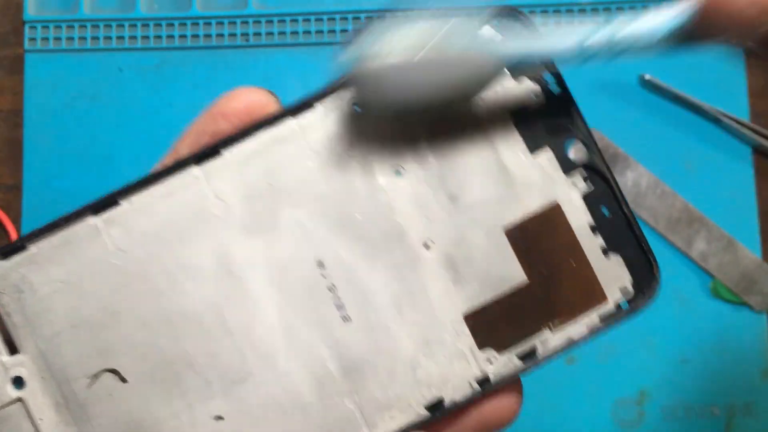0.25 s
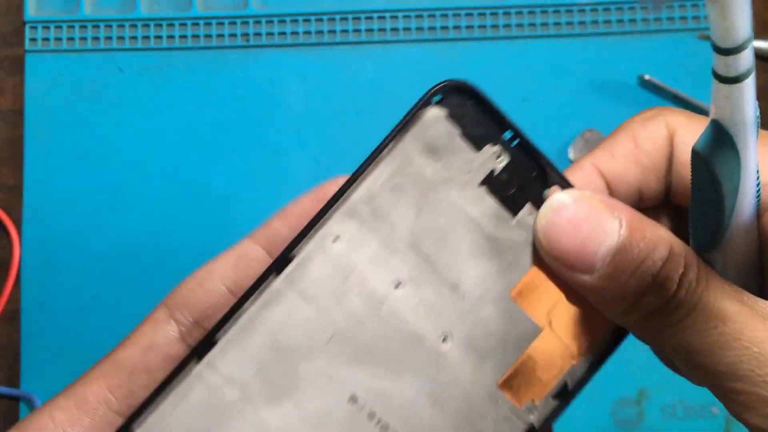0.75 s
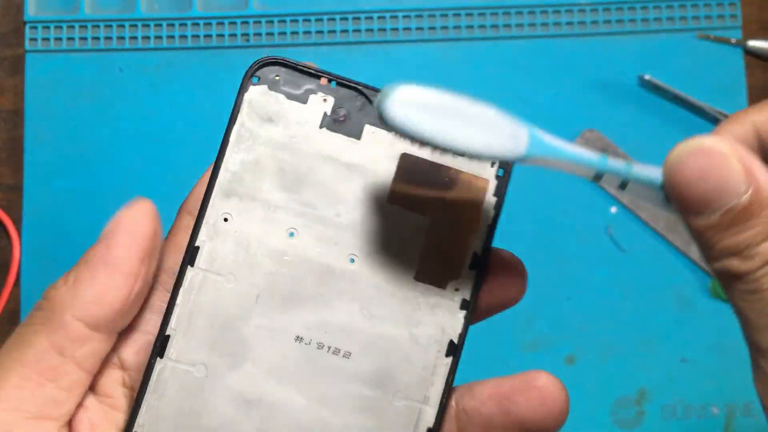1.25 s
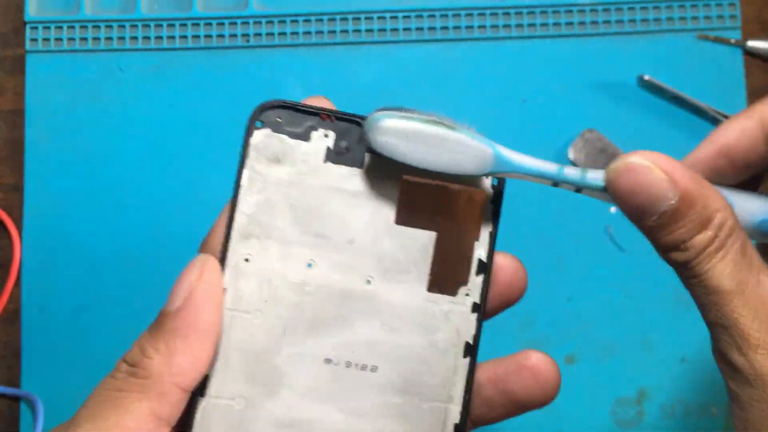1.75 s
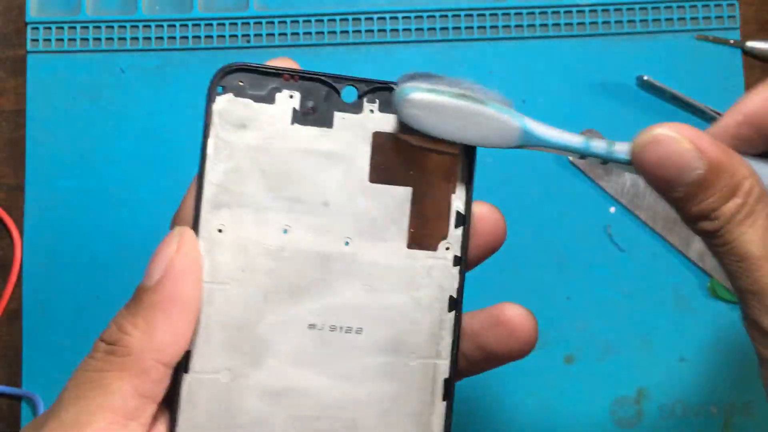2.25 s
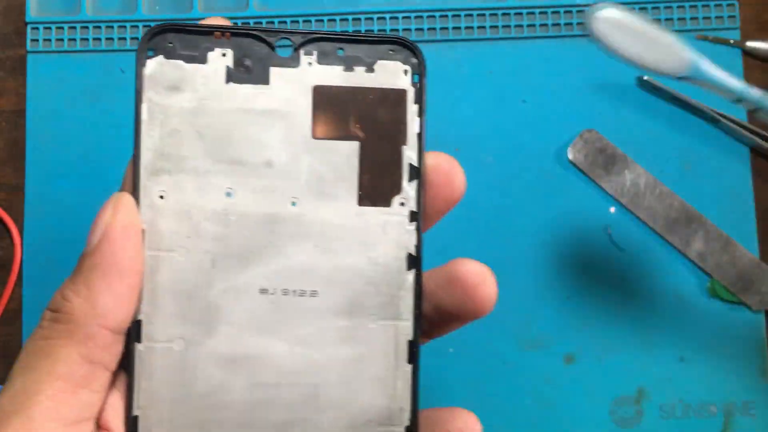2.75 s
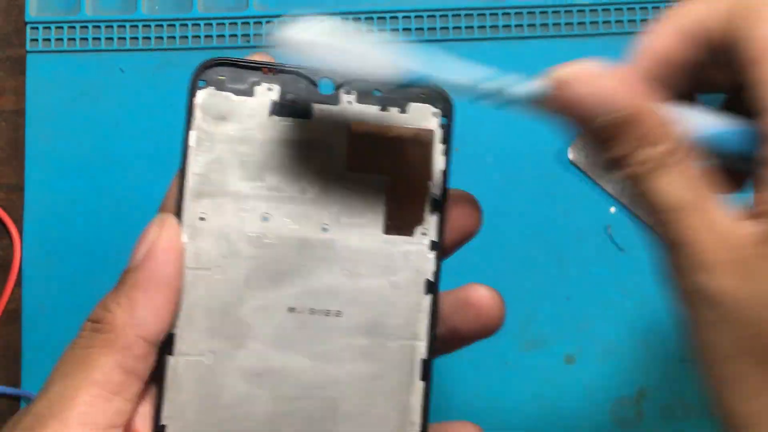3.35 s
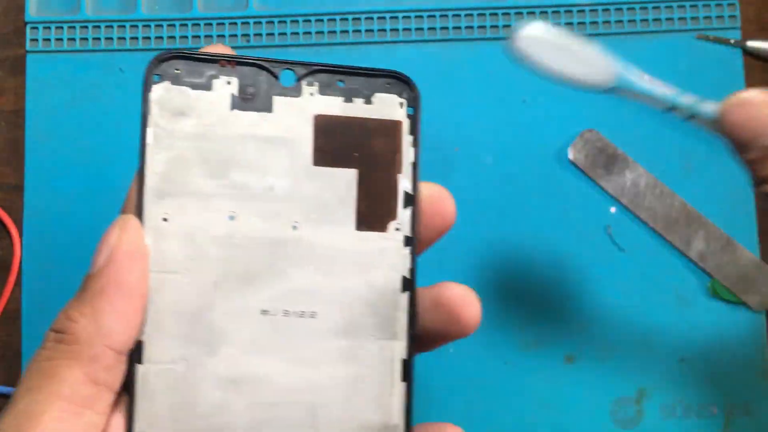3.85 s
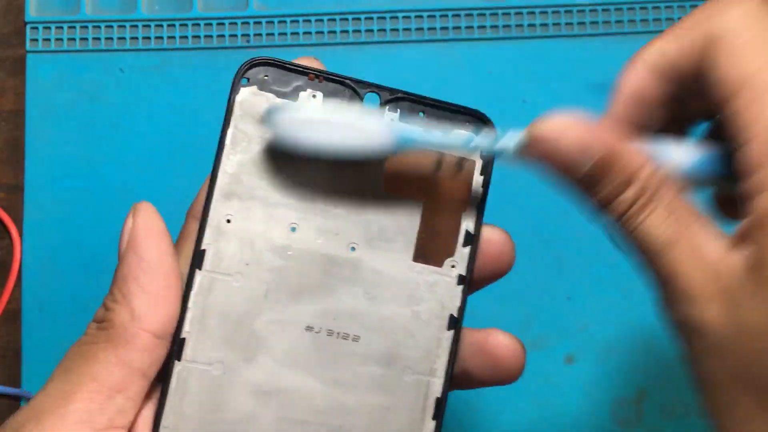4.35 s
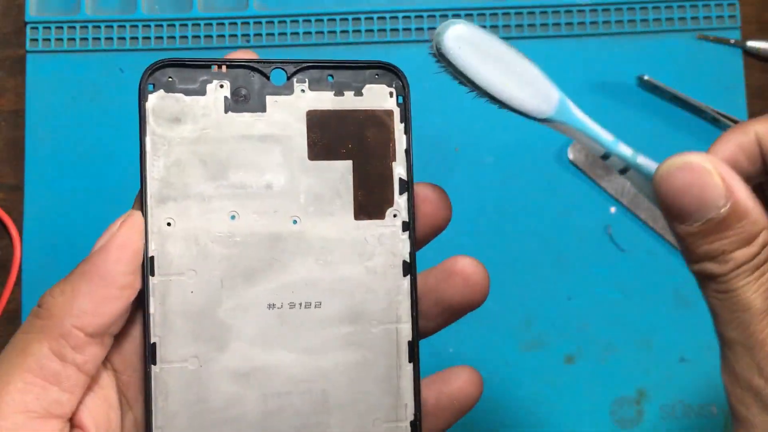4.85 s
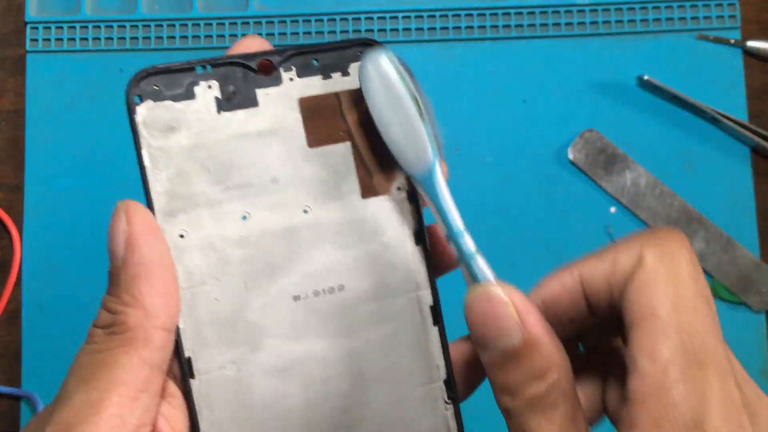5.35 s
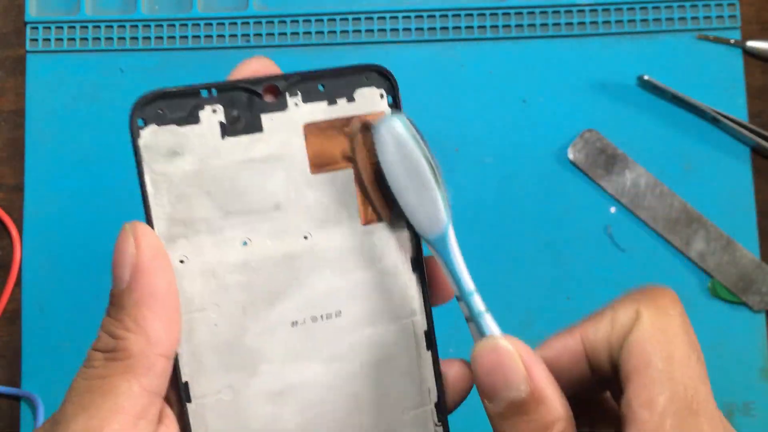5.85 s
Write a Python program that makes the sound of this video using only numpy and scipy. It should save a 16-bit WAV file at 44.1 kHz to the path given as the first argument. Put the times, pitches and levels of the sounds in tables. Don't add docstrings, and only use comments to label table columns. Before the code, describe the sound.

A toothbrush scrubs a thin metal phone frame close up in scratchy strokes, flicks and ticks, over a low idling engine and street roar.

```python
import sys
import numpy as np
from scipy import signal
from scipy.io import wavfile
from scipy.ndimage import uniform_filter1d

SR = 44100
rng = np.random.default_rng(int(sys.argv[2]) if len(sys.argv) > 2 else 0)


def wrap_up_sound(samples):
    columns = np.atleast_2d(samples).T
    tamed = np.clip(columns, -1, 1)
    steps = np.round(tamed * 32767).astype(np.int16)
    wavfile.write(sys.argv[1], SR, steps)


def gain_from_decibels(decibels):
    exponent = np.asarray(decibels, float) / 20
    return 10 ** exponent


N = 269010
T = np.arange(N) / SR


def evened(x):
    return x / np.sqrt(np.mean(x ** 2) + 1e-20)


def noise():
    return rng.standard_normal(N)


def curve(rows, column):
    rows = np.asarray(rows)
    return np.interp(T, rows[:, 0], rows[:, column])


def wobble(per_s):
    return evened(signal.lfilter([1], [1, -np.exp(-2 * np.pi * per_s / SR)], noise()))


def arch(start, length, top=0.37):
    u = np.clip((T - start) / length, 0, 1)
    phase = np.interp(u, [0, np.clip(top, .05, .95), 1], [0, .5, 1])
    return u, np.sin(np.pi * phase).clip(0, 1)


def resonate(x, hz, width):
    if np.ndim(hz) == 0:
        b, a = signal.iirpeak(hz, hz / width, SR)
        return signal.sosfilt([[*b, *a]] * 2, x)
    turn = np.exp(2j * np.pi * np.cumsum(hz) / SR)
    r = np.exp(-np.pi * width / SR)
    return 2 * (turn * signal.lfilter([(1 - r) ** 2], [1, -2 * r, r * r], x * turn.conj())).real


def body(x, modes, factor=1):
    out = 0
    for k, (hz, width, db) in enumerate(modes):
        out = out + (-1) ** k * gain_from_decibels(db) * evened(resonate(x, hz * factor, width))
    return evened(out)


def colour(x, points):
    hz, db = np.transpose(points)
    bins_hz = abs(np.fft.fftfreq(4096, 1 / SR)) + 1
    log_gain = np.log(gain_from_decibels(np.interp(np.log(bins_hz), np.log(hz), db)))
    response = np.exp(log_gain - 1j * signal.hilbert(log_gain).imag)
    impulse = np.fft.ifft(response).real[:2048]
    return signal.oaconvolve(x, impulse / np.linalg.norm(impulse))[:N]


def patchy(x, patchy_db, bright_db, size=(4, 24)):
    hz, t, z = signal.stft(x, SR, nperseg=256, noverlap=192)
    field = rng.standard_normal(z.shape[::-1]).T
    field = uniform_filter1d(field, size=size[0], axis=0)
    field = evened(uniform_filter1d(field, size=size[1], axis=1))
    lift_db = np.exp(-((hz[:, None] - 12200) / 2500) ** 2) * np.interp(t, T, bright_db)
    return signal.istft(z * gain_from_decibels(patchy_db * field + lift_db), SR, nperseg=256, noverlap=192)[1][:N]


def steadied(x, seconds):
    size = round(seconds * SR)
    power = uniform_filter1d(uniform_filter1d(x ** 2, size), size)
    return evened(x / np.sqrt(power + 0.029))


def firings(per_s, jitter, uneven_db):
    turns = np.cumsum(per_s * (1 + jitter * wobble(15))) / SR
    fired = np.diff(np.floor(turns), prepend=0) > 0
    return evened(fired * gain_from_decibels(uneven_db * noise()))


def singing(rows):
    out = np.zeros(N)
    for start, end, hz, width, db in rows:
        swell = np.sin(np.pi * np.clip((T - start) / (end - start), 0, 1))
        out += gain_from_decibels(db) * swell * evened(resonate(noise(), hz, width))
    return out


# time in seconds, level in dB, load from 0 to 1.
ENGINE_LOAD = [(0, -31, 0.16), (.2, -36.5, 0.5), (.36, -31, 0.43), (.58, -33, 0.24), (1.2, -32, 0.28),
               (1.7, -30.5, 0.2), (2.05, -32, 0.66), (2.35, -30.5, 0.18), (2.95, -32.5, 0.6),
               (3.3, -31.5, 0.43), (3.7, -32.5, 0.45), (3.86, -29.5, 0.32), (4.05, -31, 1),
               (4.75, -27, 0.57), (5.1, -26.5, 0.86), (5.27, -31.5, 0.7), (5.6, -31.5, 0.89),
               (6.1, -28.5, 0.58)]
# time in seconds, firings per second.
IDLE_PACE = [(0.0, 11.5), (1.85, 12.3), (2.58, 11), (3.77, 10.7), (6.1, 10.6)]
# pitch in Hz, width in Hz, level in dB.
BOOM_MODES = [(67.4, 26, -2.5), (96.6, 26, 1.5)]
DRONE_MODES = [(153.14, 20.1, 0)]
BURR_MODES = [(204, 25.1, 8), (256.67, 11.7, -0.5)]
HUM_MODES = [(317.2, 7.5, 1.5), (349, 25.5, -4.5), (414, 18, -14)]
# dB over the level, dB gained at full load, chance swell in dB, blur from 0 to 1.
MODE_ANSWERS = [
    (-1.5, -1.5, 1.67, 0.88),
    (-6, 0.5, 0.64, 0.47),
    (-21.5, 13, 1.7, 0.66),
    (-23, 3, -0.6, 0.75),
]
# start and end in seconds, lift in dB, note in Hz.
LORRIES = [(0.31, 0.397, 3, 290), (0.81, 1.26, 3.5, 320), (1.9, 1.76, 7.5, 219), (1.97, 2.17, 2.5, 210),
           (2.18, 2.7, 4.5, 320), (2.1, 2.75, 1.5, 153), (2.34, 3.76, 2, 320), (3.1, 4.03, 3, 146),
           (3.3, 4.96, 6.5, 320), (3.67, 3.71, 5, 320), (4.96, 5.08, 5.5, 220), (5.336, 5.73, 6.5, 163),
           (5.1, 5.76, 5.5, 330), (5.98, 6.25, 13, 84.6), (5.27, 5.84, 4.5, 72), (4.3, 5.35, 4, 250),
           (2.7, 2.85, 3, 70), (3.6, 3.1, 4.5, 70), (1.5, 2.07, 2, 68), (0.246, 0.62, 3, 86),
           (4.38, 4.2, 2, 204)]


def engine():
    clear = firings(curve(IDLE_PACE, 1), .06, 1.9)
    out = np.zeros(N)
    sets = [BOOM_MODES, DRONE_MODES, BURR_MODES, HUM_MODES]
    for modes, (db, load_db, swell_db, blur) in zip(sets, MODE_ANSWERS):
        drive = (1 - blur) * clear + blur * noise()
        swell = evened(uniform_filter1d(wobble(2.9), size=3000))
        level_db = curve(ENGINE_LOAD, 1) + db + load_db * curve(ENGINE_LOAD, 2) + swell_db * swell
        for start, end, lift_db, hz in LORRIES:
            octaves = np.log2(hz / modes[0][0])
            nearness = np.exp(-(octaves / 0.3) ** 2)
            level_db = level_db + nearness * lift_db * arch(start, end - start)[1]
        out += gain_from_decibels(level_db) * steadied(body(drive, modes), 0.073)
    return out


# time in seconds, level in dB.
ROAR_LEVEL = [(0.0, -56.5), (0.97, -58), (2.34, -59.5), (2.68, -54.5), (3.26, -51), (3.94, -51.5),
              (4.76, -49), (5.78, -45.5), (6.1, -46.5)]
# frequency in Hz, dB per Hz.
ROAR_COLOUR = [(180, -35.5), (300, 1.5), (342, -11.5), (390, -9.5), (679, -13), (839, -16.5), (1020, -12.5),
               (2340, -23), (2930, -22.5), (4840, -39), (7000, -49), (9100, -63), (15400, -120)]


def tyre_roar():
    return gain_from_decibels(curve(ROAR_LEVEL, 1) + 2.5) * patchy(colour(noise(), ROAR_COLOUR), 1.7, 0 * T)


# frequency in Hz, dB per Hz.
HISS_COLOUR = [(1500, -4), (2500, -5.5), (2900, -9), (4300, -10.5), (4900, -11.5), (6150, -9.5),
               (8300, -15), (8900, -10.5), (10400, -15), (12500, -12.5), (14300, -16.5), (16500, -23)]
# start and end in seconds, dB over the hiss.
RUSTLES = [(0.464, 0.647, 3.5), (0.673, 1.245, 3.5), (2.865, 3.297, 3), (5.0, 5.7, 2.5)]


def air():
    level_db = -59.5 + 0.22 * (curve(ROAR_LEVEL, 1) + 60)
    for start, end, db in RUSTLES:
        level_db = level_db + db * arch(start, end - start)[1]
    return gain_from_decibels(level_db) * patchy(colour(noise(), HISS_COLOUR), 1.5, 0 * T)


# start and end in seconds, pitch in Hz, width in
# Hz, level in dB.
FAN_HUM = [(0, 2.6, 316.5, 4, -53)]


def fan():
    return singing(FAN_HUM)


def swing(start, length, top, hiss_db, ring_db, rest_db, full, climb_db, scratch_db):
    slow_ring, slow_scratch = 0.26, 0.13
    plate_with_ring = 0.36
    u, speed = arch(start, length, top)
    rest = gain_from_decibels(min(rest_db - hiss_db, 0) / 2)
    gain = (1 - (1 - rest) * (1 - speed) ** full) ** 2
    on = (u > 0) * (u < 1) * gain_from_decibels(hiss_db)
    press_db = ring_db + climb_db * (u - .5)
    ring = gain ** (1 - slow_ring) * gain_from_decibels(press_db)
    scratch = gain ** (1 - slow_scratch) * gain_from_decibels(scratch_db + plate_with_ring * (press_db + 9.5))
    return on * np.array([gain, ring, scratch])


# start in seconds, length in seconds, share of the length before top speed,
# bristle hiss in dB, frame ring in dB over the hiss.
SCRUBS = [(-.03, 0.0886, 0.5, -42, -18), (.06, 0.1424, 0.54, -39, -17.5), (.203, 0.087, 0.383, -38, -22),
          (1.542, 0.18, 0.24, -37, -12.5), (1.7, 0.13, 0.39, -36, -8.5), (1.825, 0.1302, 0.44, -37, -13.5),
          (1.955, 0.1216, 0.647, -34, -14), (2.075, 0.11, 0.62, -41, -8.5),
          (2.19, 0.13, 0.61, -33.5, -11.5), (2.323, 0.12, 0.46, -36.5, -15),
          (2.455, 0.11, 0.47, -32.5, -14), (2.565, 0.13, 0.47, -37.5, -9.5), (5.36, 0.12, 0.97, -47.5, -4),
          (5.46, 0.17, 0.616, -42, -28), (5.63, 0.15, 0.52, -36, -10.5), (5.775, 0.1095, 0.32, -40.5, -7.5),
          (5.885, 0.1315, 0.73, -38, -7.5), (6.025, 0.08, 0.59, -38, -4.5)]
FLICKS = [(.306, 0.082, 0.48, -35, -14.5), (2.69, 0.099, 0.88, -30.5, -8),
          (3.195, 0.089, 0.71, -31.5, -9.5), (3.5, 0.098, 0.56, -30, -8.5), (3.815, 0.094, 0.68, -30, -8),
          (4.125, 0.077, 0.44, -29, -10)]
TOUCHES = [(.644, 0.016, 0.3, -53, -6), (1.0, 0.0592, 0.55, -50, -1), (1.14, 0.056, .3, -57, -11),
           (1.49, 0.078, 0.17, -53, -11.5)]
JABS = [
    (4.545, 0.11, 0.51, -24.5, -11),
    (5.11, 0.17, 0.418, -43, -11),
    (0.3467, 0.038, 0.57, -31, -6),
]
SCRAPES = [(.758, 0.0277, 0.43, -46.5, -5.5), (.08, .045, .4, -55.5, -2.5), (0.118, 0.053, .5, -60, -5),
           (.22, 0.05, .3, -59, -6), (0.317, 0.043, .3, -50, -6)]
# start in seconds, length in seconds, hiss in dB at landing and at the end.
DRAGS = [(3.158, 0.04, -46.5, -36.5), (3.476, 0.043, -39, -42.5), (3.779, 0.041, -33.5, -54.5),
         (4.091, 0.0402, -36, -53.5), (4.432, 0.11, -38.5, -51.5), (1.56, 1.2, -59, -55),
         (.02, 0.4, -64, -57.5)]


def strokes():
    kinds = [(SCRUBS, dict(rest_db=-62, full=1.16, climb_db=1, scratch_db=-14.5)),
             (FLICKS, dict(rest_db=-60, full=2.53, climb_db=7.5, scratch_db=-15)),
             (TOUCHES, dict(rest_db=-63, full=0.79, climb_db=0.5, scratch_db=-8)),
             (JABS, dict(rest_db=-60, full=0.55, climb_db=5, scratch_db=-11)),
             (SCRAPES, dict(rest_db=-56, full=0.54, climb_db=-5, scratch_db=0.5))]
    power = np.zeros((3, N))
    for rows, kind in kinds:
        for row in rows:
            power += swing(*row, **kind) ** 2
    over_db = np.array([[0], [-10.5], [-12.5]])
    for start, length, land_db, end_db in DRAGS:
        u = (T - start) / length
        drag_db = land_db + (end_db - land_db) * u.clip(0, 1) + over_db
        power += ((u > 0) * (u < 1) * gain_from_decibels(drag_db)) ** 2
    return uniform_filter1d(np.sqrt(power), size=110, axis=1)


# centre in seconds, half width in seconds,
# hiss gained in dB, ring gained in dB.
CATCHES = [(.072, .008, -4, -3), (.088, .01, 2, 3), (.214, .007, -9, -1), (.226, .008, 0, 0),
           (.312, .006, -8, -5), (.325, .008, -2, 1), (.345, .014, 1.5, -5), (.367, .01, -1.5, -3),
           (.376, .004, -2, -6), (1.551, .007, -6, -3), (1.565, .012, 1.5, 2), (1.665, .015, -0.5, 6),
           (1.69, .012, -2, -3), (1.712, .008, 2, 3), (1.77, .02, 1.5, 1), (1.8, .012, 2.5, 0),
           (1.855, .008, 1.5, 3), (1.885, .012, 1, 1), (1.925, .01, 1, 5), (2.04, .012, -0.5, 2),
           (2.13, .02, 2, 1), (2.17, .012, 4.5, 1), (2.215, .01, 0, 0), (2.295, .012, -1, 2),
           (2.343, .006, -6, -2), (2.36, 0.014, 2, 2.5), (2.41, .01, 1, 2.5), (2.485, .012, 1, 2),
           (2.55, .012, 3, 2), (2.605, .01, 1, 2), (2.655, .01, -1, 1), (2.715, .012, -1, 1),
           (2.745, .008, 2.5, -2), (2.775, 0.0062, 0.5, 4), (2.787, 0.0057, -8, -8), (3.26, .012, 0, 4),
           (3.565, .01, 0.5, 2), (3.822, .006, -1, -3), (3.87, .015, -1, -1.5), (4.133, .006, -2, 0),
           (4.144, .006, 0, 6), (4.572, .006, -3, -3), (4.615, .008, 0, 2), (4.634, .006, 6, 2),
           (5.658, .01, 5, -2), (5.73, .02, 1, 6.5), (5.765, .01, -6, 0), (5.81, .012, 1, 2),
           (5.99, .015, 0, 2), (6.06, .015, -1, -3.5), (5.78, .015, 3, 4), (5.89, .02, 1, 2)]


def catches():
    rows = np.array(CATCHES)
    coarse = T[::32]
    bumps = np.exp(-((coarse - rows[:, :1]) / np.maximum(rows[:, 1:2], .002)) ** 2)
    hiss_db, ring_db = rows[:, 2:].T @ bumps
    return gain_from_decibels(np.array([np.interp(T, coarse, db) for db in (hiss_db, ring_db, (hiss_db + ring_db) / 2)]))


# frequency in Hz, dB per Hz.
BRISTLE_COLOUR = [(2400, -19), (4000, -12), (4900, -10), (5400, -3), (6000, -5), (7150, -2.5), (8300, -3.5),
                  (8800, 1), (9700, 1.5), (10500, -0.5), (11700, 4), (14000, 0.5), (15000, -3.5),
                  (16500, -5)]
# pitch in Hz, width in Hz, level in dB.
HOLLOW_MODES = [(787, 320, -8.5), (1450, 520, 7), (1765, 600, 4.5), (2030, 2200, -4)]
PLATE_MODES = [(2720, 2920, 7.5), (3530, 3000, 7.5)]
# time in seconds, centre of the hollow in Hz, lift of the 12 kHz sizzle in dB.
GRIP = [(0, 1490, 0), (.31, 1510, -5.5), (.37, 1590, 0.5), (.65, 1450, 1), (.78, 1560, -3),
        (1.03, 1413, -9), (1.6, 1470, -4), (1.8, 1540, -4), (2.02, 1510, 0), (2.14, 1600, 0),
        (2.38, 1490, -0.52), (2.77, 1450, -2), (3.55, 1510, -4), (4.17, 1505, -5.5), (4.6, 1620, -3.5),
        (5.2, 1470, -3.5), (5.73, 1400, -4.5), (6.1, 1340, 0)]


def brush():
    hiss_gain, ring_gain, plate_gain = strokes() * catches()
    slip_db = 2.14 * np.minimum(rng.exponential(1, N), 4) + .9 * wobble(37.4)
    slips = evened(noise() * gain_from_decibels(slip_db))
    tufts = evened(noise() * gain_from_decibels(2.6 * wobble(87)))
    hiss = patchy(colour(slips, BRISTLE_COLOUR), 2.3, curve(GRIP, 2), size=(3, 30))
    shift = curve(GRIP, 1) / 1500 * (1 + .045 * uniform_filter1d(wobble(8), size=600))
    ring = steadied(body(tufts, HOLLOW_MODES, shift), 0.085)
    plate = body(slips, PLATE_MODES, shift)
    return hiss_gain * gain_from_decibels(-0.25) * hiss + ring_gain * ring + plate_gain * plate


# start and end in seconds, pitch in Hz, width in Hz, level in dB.
PLATE_SONGS = [(.09, .17, 7100, 700, -51), (.22, .28, 7300, 500, -50), (.225, .27, 2750, 300, -55),
               (.316, .345, 2700, 400, -47), (.352, .38, 2000, 600, -42), (.762, .783, 3500, 900, -46),
               (.764, .782, 6900, 600, -49), (1.72, 1.8, 1800, 300, -49), (2.0, 2.06, 2800, 600, -52),
               (2.235, 2.27, 2700, 400, -50), (4.44, 4.49, 5500, 400, -48), (4.585, 4.63, 5900, 800, -37),
               (4.59, 4.63, 2100, 500, -40), (5.7, 5.75, 4900, 900, -47), (5.96, 6.0, 5000, 900, -51)]


def plate_songs():
    return singing(PLATE_SONGS)


# time in seconds, # tick in dB, frame ring in dB over the tick, thud in dB over the tick, plate mode
# in Hz.
TAPS = [(0.0943, -25, -7, -39, 8400), (0.2219, -42, -25, -30, 7290), (0.3188, -27, -8, -35, 7100),
        (0.3801, -37, -28, -28, 2900), (0.6479, -56.5, -3.5, -24, 2380), (0.7134, -29, -7, -29.5, 2130),
        (0.7723, -28, -12, -29, 3480), (1.502, -33.5, 2, -27.5, 2120), (2.0445, -42.5, -26, 5.5, 8930),
        (3.1568, -26.5, -4, -17, 2140), (3.476, -22.5, -17, -36.5, 4650), (3.4814, -24, -18, -30.5, 2130),
        (3.778, -25.5, -18.5, -31, 5330), (4.0903, -39.5, -6, -25, 9000), (4.103, -30.5, 6, -18.5, 8540),
        (4.431, -26, -12.5, -28.5, 8812), (4.4368, -19, -3.5, -38.5, 5600), (4.595, -30, -22.5, -31, 8850),
        (5.1169, -29, -21.5, -24.5, 2120), (5.1925, -26, 1, -24, 8260), (5.2065, -18.5, 4.5, -18.5, 2380),
        (5.2287, -40, 13, -19.5, 2790), (5.906, -32, -15, -20.5, 2682), (5.9781, -27, -21.5, -29, 5430)]
MORE_TAPS = [(1.5585, -30, -10, -30, 6000), (1.7089, -40, -8, -30, 6000), (2.045, -29, -20, -30, 3000),
             (2.3495, -28, -15, -30, 7000), (2.7775, -27, 0, -25, 5500), (3.508, -26, -8, -30, 6500),
             (3.831, -29, -10, -30, 6000), (4.141, -26, -4, -30, 6000), (4.4405, -26, -3, -30, 8500),
             (4.5955, -23, 0, -30, 9000), (5.655, -33, -10, -30, 7500)]


def contacts(rows):
    ticks, rings = np.zeros((2, N))
    t = np.arange(400) / SR
    for s, db, ring_db, thud_db, plate_hz in rows:
        first = round(s * SR)
        crackle = rng.standard_normal(400) * (1 - np.exp(-t / 0.00058)) * np.exp(-t / 0.0015)
        ticks[first:][:400] += gain_from_decibels(db) * crackle
        push = abs(crackle) * np.exp(-t / .00006)
        modes = [(1500, .0007, ring_db - 10.0), (910, .0018, thud_db + 0.27), (plate_hz, .0003, -11)]
        for hz, decay_s, over_db in modes:
            ring = np.convolve(push, np.sin(2 * np.pi * hz * t) * t * np.exp(-t / (1.67 * decay_s)))
            rings[first:][:799] += gain_from_decibels(db + over_db) * ring / abs(ring).max()
    tick_colour = [(2000, -23.5), (3500, 0.5), (5500, 3), (9000, 0), (12000, 1), (16000, -7)]  # (Hz, dB)
    return gain_from_decibels(-5.5) * colour(ticks, tick_colour) + rings


# start and end in seconds, pitch in Hz, width in Hz, level in dB.
SQUEALS = [
    (1.2, 1.34, 9300, 200, -72),
    (2.9, 3.162, 6700, 250, -67),
    (2.9, 3.4, 12600, 1270, -66.5),
    (3.91, 4.08, 6180, 333, -67),
    (5.82, 5.92, 1120, 54, -47),
    (5.795, 5.88, 1270, 100, -49),
    (5.605, 5.953, 382.5, 27, -48),
]


def squeals():
    return singing(SQUEALS)


# time in seconds, firings per second, level in dB.
BIKE_PASS = [(2.1, 24.3, -62), (2.3, 24.3, -52), (2.55, 24.15, -48), (2.8, 24.1, -43), (3.08, 24.05, -43.5),
             (3.17, 24, -60), (3.3, 24, -80)]
# pitch in Hz, width in Hz, level in dB.
BIKE_PIPE = [(245.3, 24.4, 3.5), (339, 24, 4), (397, 21, -1.5), (491.4, 14.7, -10)]


def motorbike():
    return gain_from_decibels(curve(BIKE_PASS, 2)) * body(firings(curve(BIKE_PASS, 1), 0.0027, 1.0), BIKE_PIPE)


def room(x, t60=0.34):
    t = np.arange(SR // 3) / SR
    sparse = rng.choice([-1., 1.], len(t)) * (rng.random(len(t)) < .08)
    tail = sparse * gain_from_decibels(-60 * t / t60) * (t > .003)
    return signal.oaconvolve(x, tail / np.linalg.norm(tail))[:N]


def scene():
    near = brush() + contacts(TAPS)
    street = engine() + tyre_roar() + air() + squeals() + motorbike()
    return (near + gain_from_decibels(-18.5) * room(near) + street + fan() + plate_songs() + contacts(MORE_TAPS))[None]


def band_limit(x):
    return signal.sosfilt(signal.butter(12, 16910, fs=SR, output="sos"), x)


# frequency in Hz, width in Hz, share removed.
PORT_DIPS = [(4970, 280, .32), (10400, 450, 0.3)]


def record(dry):
    for hz, width, share in PORT_DIPS:
        dry = dry - share * signal.lfilter(*signal.iirpeak(hz, hz / width, SR), dry)
    bass_cut = signal.butter(4, 42, "high", fs=SR, output="sos")
    edge = signal.firwin(401, 15770, window=("kaiser", 7), fs=SR)
    mix = signal.oaconvolve(signal.sosfilt(bass_cut, dry), edge[None], "same")
    return band_limit(mix)


dry = scene()
out = record(dry)
wrap_up_sound(out)
```